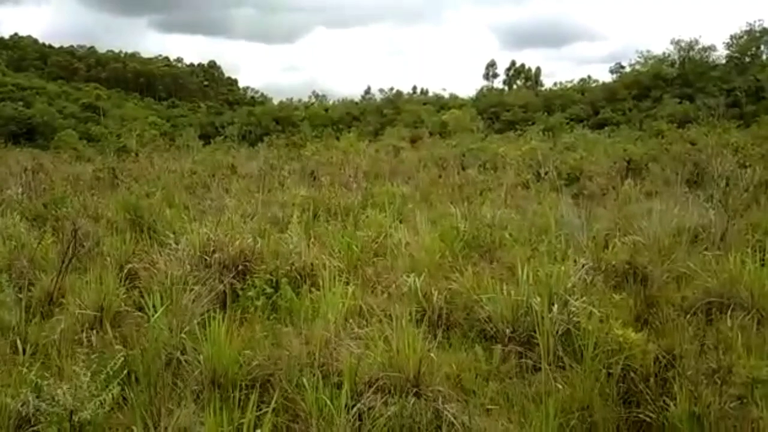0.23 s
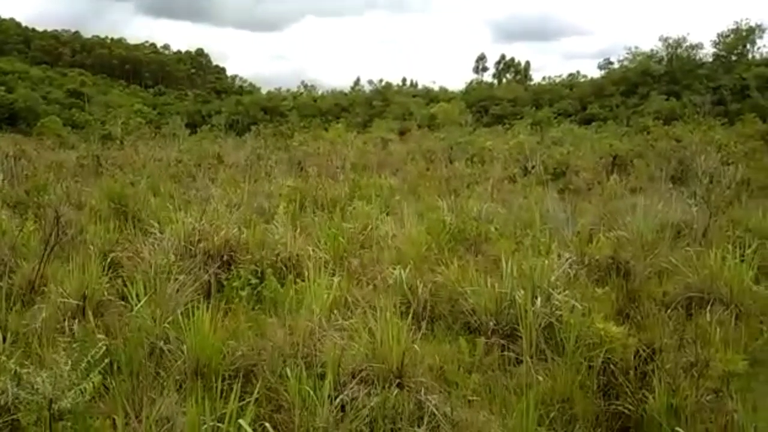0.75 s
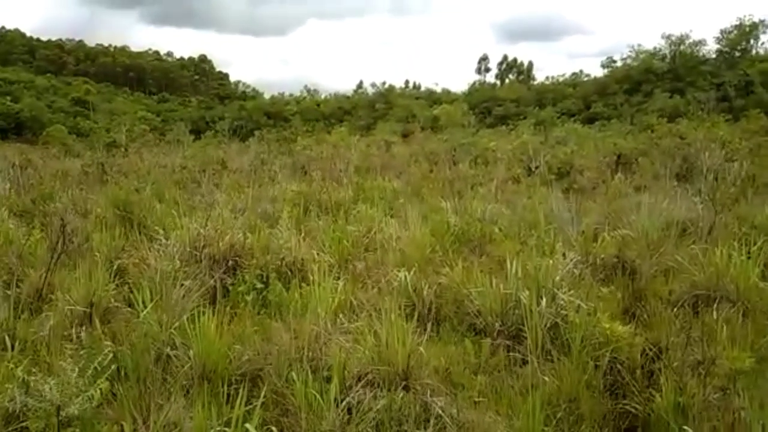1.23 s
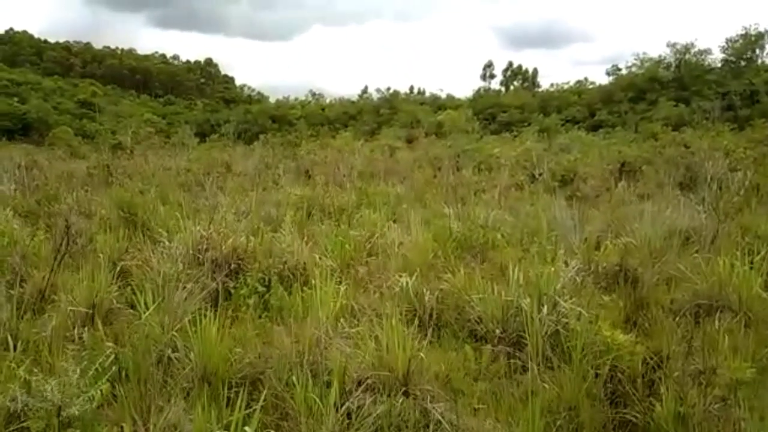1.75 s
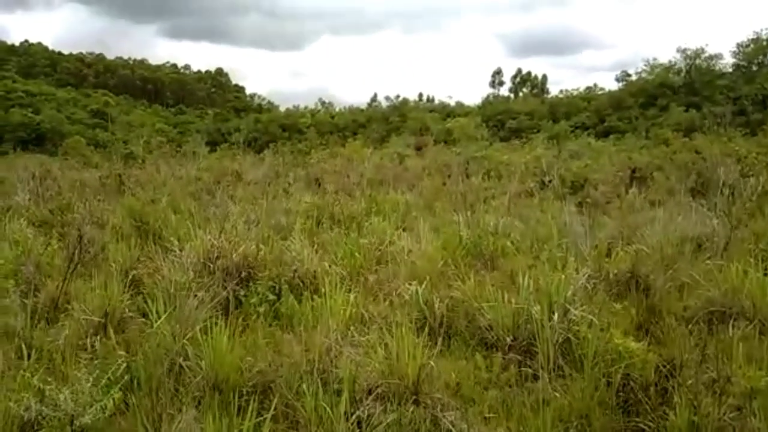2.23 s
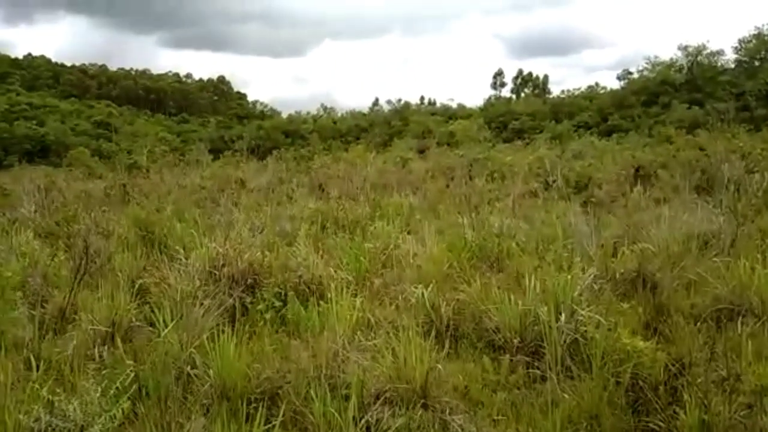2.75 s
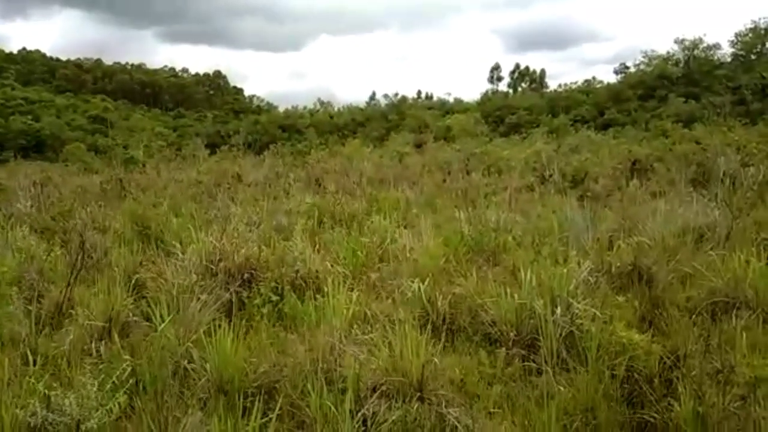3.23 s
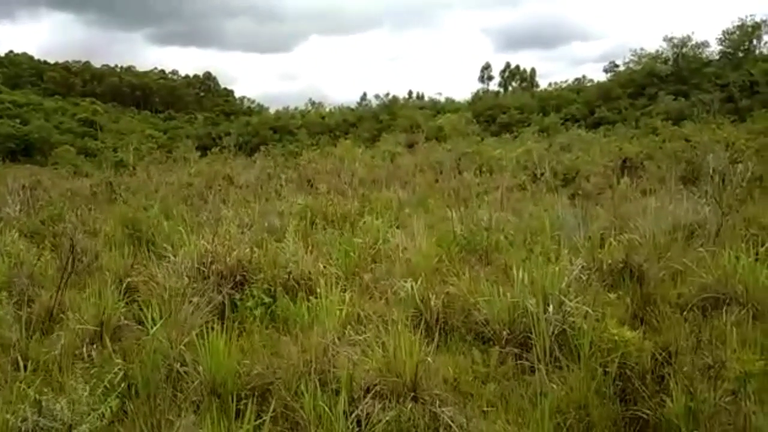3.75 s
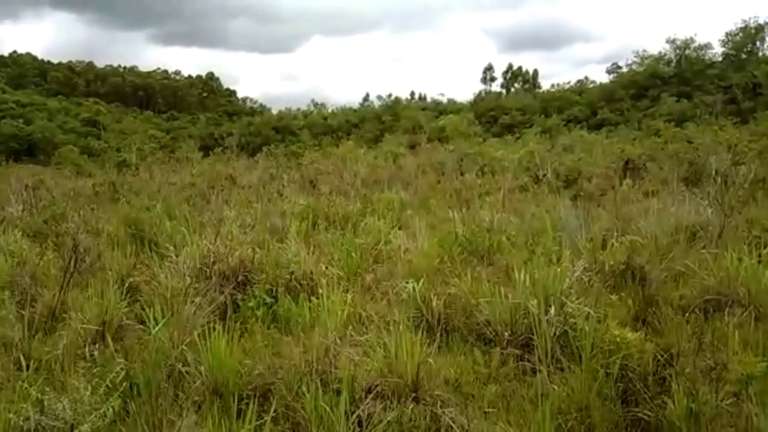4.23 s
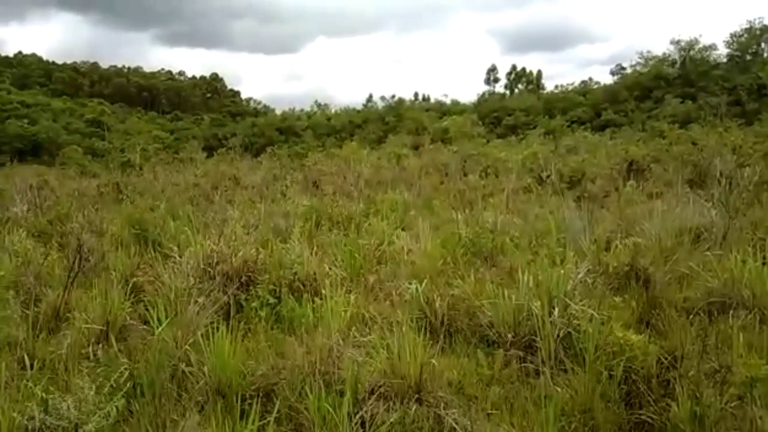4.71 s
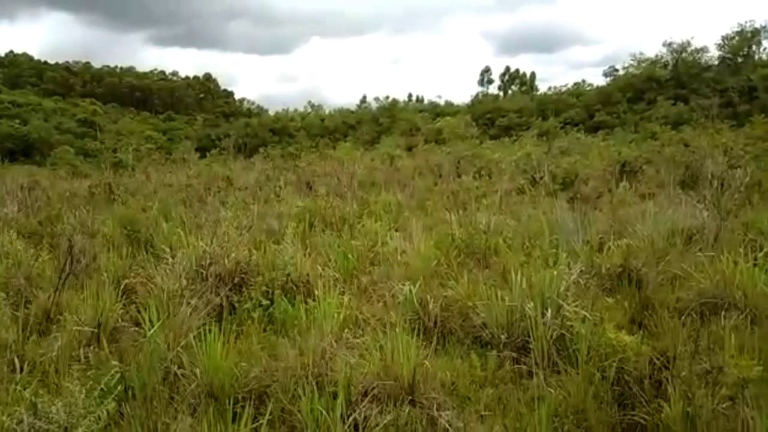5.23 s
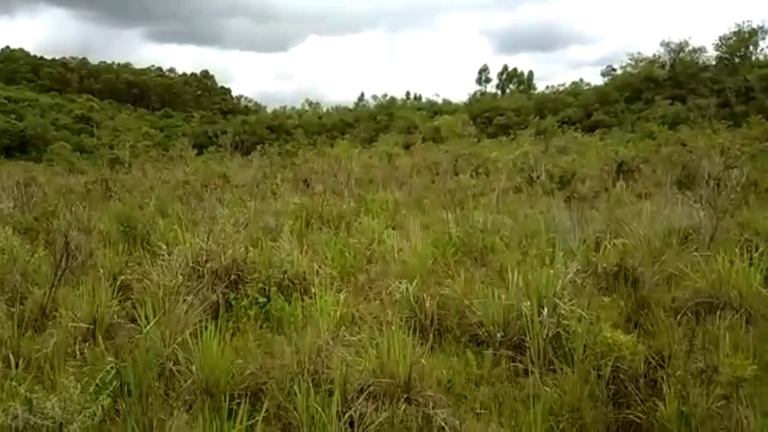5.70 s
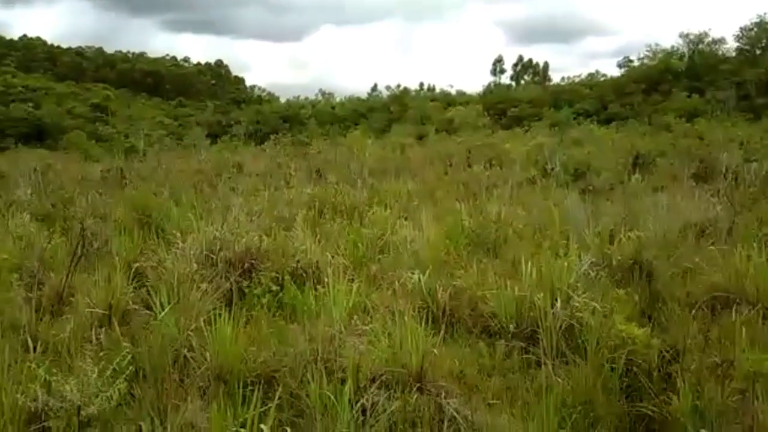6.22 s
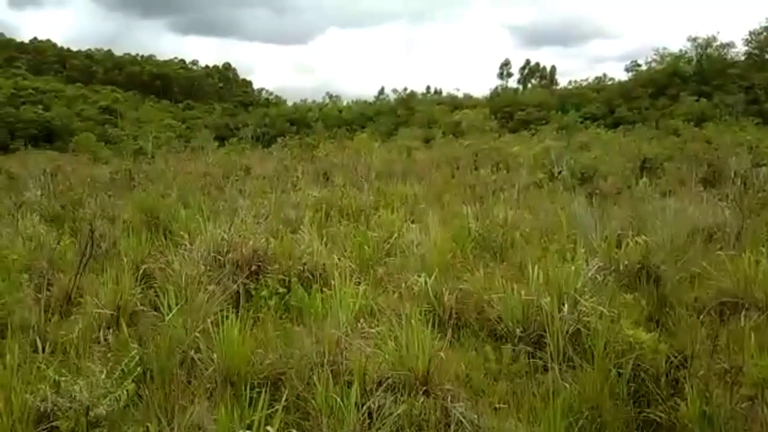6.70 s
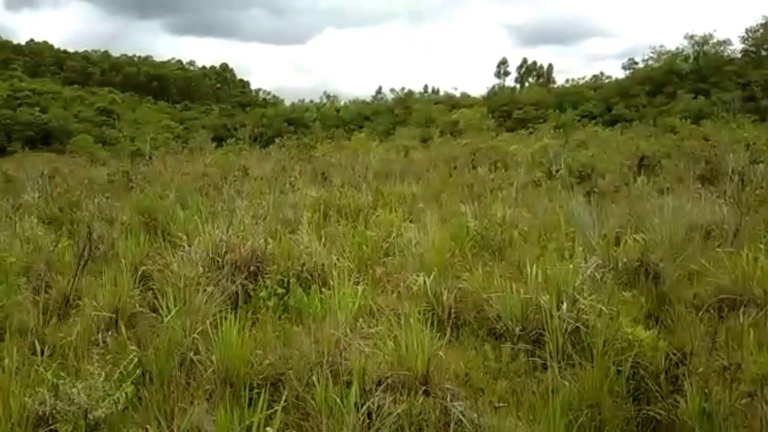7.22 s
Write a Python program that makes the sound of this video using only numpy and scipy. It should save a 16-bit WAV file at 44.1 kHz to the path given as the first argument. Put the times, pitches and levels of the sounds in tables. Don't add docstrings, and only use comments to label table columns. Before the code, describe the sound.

Distant pack of dogs howling and yipping over quiet grassland, brief bird whistles, later a chirping insect, under a faint airy hush.

```python
import sys
import numpy as np
from scipy import signal
from scipy.fft import rfft, irfft
from scipy.io import wavfile

SR = 44100
rng = np.random.default_rng(int(sys.argv[2]) if len(sys.argv) > 2 else 0)


def makeup_ratio(level_db):
    decades = np.asarray(level_db, float) / 20
    return 10 ** decades


def dump_mix(stems):
    frames = np.atleast_2d(stems).T
    limited = np.clip(frames, -1, 1)
    pcm = np.round(limited * 32767).astype(np.int16)
    wavfile.write(sys.argv[1], SR, pcm)


N = 328986


def rms_one(x):
    return x / np.sqrt(np.mean(x ** 2) + 1e-20)


def in_time(rows):
    s, *columns = np.transpose(rows)
    at = np.arange(round(s[0] * SR), min(round(s[-1] * SR), N))
    return at, [np.interp(at / SR, s, c) for c in columns]


def at_hz(points, hz):
    return np.interp(np.log(hz), np.log(np.array(points)[:, 0]), np.array(points)[:, 1])


def fade(count, seconds):
    return np.clip(np.minimum(np.arange(count), np.arange(count)[::-1]) / (seconds * SR), 0, 1)


def drift(rate):
    r = np.exp(-2 * np.pi * rate / SR)
    once = signal.lfilter([1], [1, -r], rng.standard_normal(N + SR))
    return rms_one(signal.lfilter([1], [1, -r], once)[SR:])


def resonate(x, modes):
    out = 0
    for k, (hz, width, level_db) in enumerate(modes):
        r = np.exp(-np.pi * width / SR)
        b = (1 - r * r) / 2 * np.array([1, 0, -1])
        a = [1, -2 * r * np.cos(2 * np.pi * hz / SR), r * r]
        twice = signal.lfilter(b, a, signal.lfilter(b, a, x + 1e-18))
        out = out + (-1) ** k * makeup_ratio(level_db) * twice
    return out


def left_right(tilt_db):
    return makeup_ratio(np.array([[tilt_db], [-tilt_db]]))


def place(x, pan_db, lag):
    left = np.interp(np.arange(len(x)) - lag, np.arange(len(x)), x)
    return np.array([left, x]) * left_right(pan_db / 2)


# (from time [s], howl cycles per slap, irregularity [0-1])
SLAPS = [(0, 3, 0), (.3, 5, 0), (1.4, 5, .5), (1.72, 2, .03), (2.22, 5, .16), (3.5, 5, 0), (4.17, 5, .3),
         (4.45, 5, .15), (4.89, 5, 0), (6.4, 5, .12), (6.61, 5, .02), (6.715, 3, 0), (6.815, 5, .2),
         (7.2, 5, .04)]


def slapping(s):
    starts, cycles, chaos = np.transpose(SLAPS)
    k = np.searchsorted(starts, s, side="right") - 1
    return cycles[k], chaos[k]


# (frequency [Hz], gain [dB per dB of opening])
OPENING = [(560, -1), (750, 0), (1130, 0), (1350, -0.64), (1900, -0.23)]
# (frequency [Hz], gain [dB per dB of strain])
STRAIN = [(1150, 0), (1300, 1)]


def howls(calls, places, voice, wobble, flutter, shimmer_db, count=5):
    erratic = slapping(np.arange(N) / SR)[1]
    unsteady = wobble * drift(16.7) + flutter * erratic * drift(101.3)
    out, shimmer = np.zeros((2, N)), drift(12.7)
    for call, (pan_db, lag) in zip(calls, places):
        at, (hz, level_db, opening_db, *strain_db) = in_time(call)
        phase = 2 * np.pi * np.cumsum(hz * (1 + unsteady[at])) / SR
        tone = 0
        for k in range(1, count + 1):
            colour_db = at_hz(voice, k * hz) + opening_db * at_hz(OPENING, k * hz)
            colour_db = colour_db + sum(strain_db) * at_hz(STRAIN, k * hz)
            tone = tone + makeup_ratio(colour_db) * np.sin(k * phase + k - 1)
        loudness = np.sqrt(2) * makeup_ratio(level_db + shimmer_db * shimmer[at])
        out[:, at] += place(tone * loudness * fade(len(at), 0.0034), pan_db, lag)
    return out


# (time [s], pitch [Hz], level [dB], mouth opening [dB])
FIRST_HOWL = [
    (0.0, 447.7, -39, -0.5),
    (0.318, 448.3, -37.5, 2.5),
    (1.178, 458.3, -43.5, -3),
    (1.215, 459.5, -48.5, -11.5),
    (1.26, 464, -60, -33),
]
SECOND_HOWL = [
    (1.24, 358.7, -56, 3),
    (1.271, 372, -34, -1),
    (1.295, 420, -36, -2),
    (1.42, 461.4, -32.5, -1),
    (1.58, 463.7, -32, 4.5),
    (1.701, 464, -35, 0),
]
LONG_HOWL = [
    (1.695, 446, -33.5, 2),
    (1.95, 443, -32.5, -2),
    (2.3, 446, -35.5, -1.5),
    (2.5, 445, -36.5, -5),
    (3.3, 445, -41.5, 3),
    (3.45, 442, -35.5, 0),
    (3.6, 440.4, -43, -1),
    (3.69, 435, -45, 5),
]
BELL_HOWL = [
    (4.21, 319, -50, 0),
    (4.255, 374, -36, 4),
    (4.28, 420, -37, -9.5),
    (4.35, 442, -36, 4),
    (4.6, 467.1, -32.5, 0),
    (4.85, 431.8, -37.5, 4),
    (5.48, 448.8, -36, 3),
    (6.3, 442.7, -37, 2),
    (6.36, 433.6, -49, -14),
]
# (left minus right [dB], left lag [samples])
CLEAR_AT = [(5.5, .1), (3.5, .2), (2.5, .2), (1, 3.4)]
# (frequency [Hz], level [dB])
CLEAR_VOICE = [(320, -23.5), (450, -10), (750, 2), (900, 0), (1130, 4), (1340, -23), (1800, -31.5),
               (2300, -62)]


def clear_howls():
    calls = [FIRST_HOWL, SECOND_HOWL, LONG_HOWL, BELL_HOWL]
    return howls(calls, CLEAR_AT, CLEAR_VOICE, wobble=0.0026, flutter=0.039, shimmer_db=1.13)


HOARSE = [
    [(1.8, 463.9, -44, 8), (2.17, 468.3, -37, 8), (2.22, 475.4, -29.5, 1), (2.288, 482.2, -28, 7),
     (2.694, 482.3, -27.5, -1), (2.826, 484.9, -30, 3), (3.318, 494, -25.5, 2.5), (3.44, 460.6, -35, -0.5),
     (3.58, 459.5, -40, -9.5)],
    [(6.33, 438, -45.5, -4, 2), (6.43, 465.8, -43.5, 21, 12), (6.7, 458.3, -52, 2, 17),
     (6.766, 449, -55.5, -12, 10), (6.92, 476.8, -44.5, -1, 8.5), (7.17, 455, -43.5, 2, 11)],
    [(7.175, 457, -43, -4, 9), (7.22, 457.6, -43, -6.5, 3.5), (7.336, 468.4, -46.5, -18, 2),
     (7.4, 468.6, -50, -10.5, 9), (7.46, 462, -46, 3, 14)],
]
# (left minus right [dB], left lag [samples])
HOARSE_AT = [(6.4, .1), (6.1, 1.8), (6.8, .1)]
# (frequency [Hz], level [dB])
HOARSE_VOICE = [(460, -10.5), (970, -0.5), (1450, -19.5), (1930, -27.5), (2400, -94)]


def hoarse_howls():
    return howls(HOARSE, HOARSE_AT, HOARSE_VOICE, wobble=0.0038, flutter=0.0966, shimmer_db=2.0)


# (time [s], first slap [dB], second slap [dB])
BREAKS = [
    (1.2326, -50, -41),
    (3.5851, -43, -61),
    (3.7135, -57, -67),
    (6.324, -42.5, -52),
]
# (time [s], level [dB])
STRAYS = [(3.506, -51), (7.022, -52), (7.048, -50), (7.0744, -49), (7.1174, -50), (7.165, -43),
          (1.265, -42)]


def lone_slaps():
    break_gap_s, break_throat_db, lone_throat_db = 0.0165, -11.5, -15
    dying_s, dying_gap_s, dying_db, dying_loss_db = 4.928, 0.0755, -43, 2.3
    pairs = []
    for s, *both in BREAKS:
        pairs += [(s + k * break_gap_s, db, break_throat_db) for k, db in enumerate(both)]
    dying = [(dying_s + k * dying_gap_s, dying_db - k * dying_loss_db) for k in range(7)]
    early = [(s - 0.016, db - 4) for s, db in dying[:3]]
    return pairs + [(s, db, lone_throat_db) for s, db in dying + early + STRAYS]


# (start [s], full from [s], full until [s], end [s], level at the mouth resonance [dB])
RASP = [
    (0.0, -0.004, 0.017, 0.18, -41.5),
    (1.398, 1.426, 1.62, 1.75, -46.5),
    (1.83, 2.28, 3.37, 3.5, -32),
    (4.158, 4.173, 4.776, 4.92, -38.5),
    (6.405, 6.43, 6.85, 7.09, -39),
    (7.23, 7.255, 7.42, 7.37, -38.5),
]
RASP_THROAT = [-0.5, 8, -1, -2, -3.5, -2.5]
# (frequency [Hz], width [Hz], level [dB])
MOUTH = [(986, 92, 8.5), (1123, 101, 8.5), (1408, 300, -10.5), (1775, 106, -10), (1947, 89, -9)]
THROAT_HEAD_RAISED = [(672, 167, 7.5), (254, 90, -15)]
THROAT_HEAD_DOWN = [(580, 150, 5), (247, 82, -10)]


def rasp():
    start_db, end_db, head_down_s = -28, -16.5, 4.9
    mouth, throat, soft = np.zeros(N), np.zeros(N), np.zeros(N)
    calls = [FIRST_HOWL, SECOND_HOWL, HOARSE[0], BELL_HOWL, HOARSE[1], HOARSE[2]]
    for (*times, full_db), throat_db, call in zip(RASP, RASP_THROAT, calls):
        pitch = np.array(call)
        s = max(times[0], 0)
        for gap, size, balance in rng.standard_normal((400, 3)):
            if s >= min(times[-1], (N - 1) / SR):
                break
            cycles, chaos = slapping(s)
            period = cycles / np.interp(s, pitch[:, 0], pitch[:, 1])
            level_db = full_db + np.interp(s, times, [start_db, 0, 0, end_db]) + 4 * chaos * size
            i = int(s * SR)
            mouth[i] += makeup_ratio(level_db + 36.5) * np.sqrt(period * 100)
            throat[i] += mouth[i] * makeup_ratio(throat_db + 7.7 * chaos * balance)
            s += period * np.clip(1 + 0.68 * chaos * gap, 0.3, 2)
    for s, peak_db, throat_db in lone_slaps():
        soft[int(s * SR)] += makeup_ratio(peak_db + 42)
        throat[int(s * SR)] += makeup_ratio(peak_db + throat_db + 53.0)
    dull = signal.butter(3, 1500, fs=SR, output="sos")
    mouth += signal.sosfilt(dull, soft + 1e-18)
    raised = np.arange(N) < head_down_s * SR
    low = resonate(throat * raised, THROAT_HEAD_RAISED) + resonate(throat * ~raised, THROAT_HEAD_DOWN)
    distance = signal.butter(6, 2100, fs=SR, output="sos")
    return signal.sosfilt(distance, resonate(mouth, MOUTH) - low)


# (time [s], pitch [Hz], level [dB], mouth opening [dB], strain [dB])
CRIES = [
    [(1.325, 515, -39.5, -1, 2.5), (1.35, 535, -37, -1.5, 4), (1.385, 485.4, -37.5, -8.5, 4),
     (1.425, 452, -47.5, -11, 2), (1.48, 500, -49.5, 4, 8), (1.53, 485, -56, 1, 6)],
    [(1.91, 495, -49, -9, -5), (1.941, 512, -45, -10.5, -0.5), (2.025, 466.8, -36, -6.5, 7.5),
     (2.068, 465, -36, 4, -4.5), (2.12, 501, -37, -4, 2), (2.22, 475, -40, 3, -3)],
    [(3.988, 492, -56, -12, 8.5), (4.035, 451.6, -58.5, -24.5, 10), (4.06, 425, -53, -16, -8),
     (4.14, 455, -40, 2, -5), (4.172, 490, -37.5, 18, -3), (4.25, 519.4, -39.5, 15, -9)],
    [(5.975, 468, -62, -13, 7), (6.0, 462, -55.5, -15, 11.5), (6.045, 422, -57, -16, -1),
     (6.15, 440, -50.5, -5.5, -3), (6.33, 445, -52.5, -5, 4)],
]
# (left minus right [dB], left lag [samples])
CRIES_AT = [(6.7, .11), (6.1, .1), (5.7, .12), (3.0, 2.1)]
# (frequency [Hz], level [dB])
CRY_VOICE = [(450, 0), (950, 0.5), (1400, -9), (1900, -11.5), (2400, -30)]


def cries():
    return howls(CRIES, CRIES_AT, CRY_VOICE, wobble=0.006, flutter=0.043, shimmer_db=3.0)


def glides(rows):
    peak_share, start_db, end_db = 0.49, -11, -13
    calls = []
    for s, length, from_hz, to_hz, db in rows:
        done = 0.734 if to_hz > from_hz else 0.404
        peak_hz = from_hz + done * (to_hz - from_hz)
        calls.append([(s, from_hz, db + start_db, 0),
                      (s + peak_share * length, peak_hz, db, 0),
                      (s + length, to_hz, db + end_db, 0)])
    return calls


# (time [s], length [s], from pitch [Hz], to pitch [Hz], peak level [dB])
YELPS = [
    (1.742, .055, 320, 388, -40),
    (3.575, .04, 440, 410, -43),
    (3.175, 0.042, 430, 405, -33),
]
# (left minus right [dB], left lag [samples])
YELPS_AT = [(5.1, .11), (2.9, 5), (3.5, 8)]
# (frequency [Hz], level [dB])
YELP_VOICE = [(400, -8), (750, 7.5), (1050, 4), (1250, 2.5), (1450, -4), (1700, -10.5), (1950, -1),
              (2200, -40)]


def yelps():
    return howls(glides(YELPS), YELPS_AT, YELP_VOICE, wobble=0.0054, flutter=0.027, shimmer_db=4.5)


# (time [s], length [s], from pitch [Hz], to pitch [Hz], peak level [dB])
SHRIEKS = [
    (3.69, .045, 874, 543, -43),
    (7.17, 0.039, 804, 761, -37.5),
]
# (time [s], pitch [Hz], level [dB], mouth opening [dB])
SCREAM = [
    (3.105, 1076, -37, 8),
    (3.125, 1038, -26.5, 10),
    (3.145, 961, -33, -9),
    (3.163, 790, -33.5, -5),
    (3.175, 850, -34, 5),
    (3.2, 834.5, -37, 12),
]
# (left minus right [dB], left lag [samples])
SHRIEKS_AT = [(1.5, 8.1), (7, .1), (3.4, 8.8)]
# (frequency [Hz], level [dB])
SHRIEK_VOICE = [(600, -6), (850, -0.5), (1050, 3), (1500, -1.5), (1950, -1.5), (2150, -18), (2500, -45)]


def shrieks():
    calls = glides(SHRIEKS) + [SCREAM]
    return howls(calls, SHRIEKS_AT, SHRIEK_VOICE, wobble=0.0032, flutter=0.02, shimmer_db=0.0, count=2)


# (time [s], length [s], from pitch [Hz], to pitch [Hz], peak level [dB])
YIPS = [
    (1.228, 0.025, 1433, 1340, -46),
    (1.465, 0.072, 1247, 1264, -41),
    (1.54, 0.048, 730, 690, -34),
    (1.54, 0.077, 430, 174, -50),
    (4.88, 0.63, 651, 658, -61),
    (5.48, 0.059, 430.7, 367.5, -51.5),
    (7.15, .03, 567, 573, -31.5),
]
# (left minus right [dB], left lag [samples])
YIPS_AT = (2.6, .3)
# (frequency [Hz], level [dB])
YIP_VOICE = [(200, 0), (1500, 0)]


def yips():
    places = [YIPS_AT] * len(YIPS)
    return howls(glides(YIPS), places, YIP_VOICE, wobble=0.0079, flutter=0.01, shimmer_db=1, count=1)


# (delay [s], level [dB], left minus right [dB])
ECHOES = [
    (0.044, -18.5, -9.5),
    (.097, -14.5, -1.5),
    (.16, -35, 28),
    (.34, -29.5, 18),
]


def tree_line(x):
    answer = np.zeros((2, SR // 2))
    dull = signal.sosfilt(signal.butter(2, 1500, fs=SR, output="sos"), x)
    for delay, level_db, pan_db in ECHOES:
        leaves = rng.standard_normal((2, 2600)) * np.hanning(2600) / 31
        answer[:, int(delay * SR):][:, :2600] += leaves * makeup_ratio(level_db) * left_right(pan_db / 2)
    return signal.fftconvolve(dull[None], answer, axes=1)[:, :N]


CHIRPS = [3.5409, 3.7638, 3.9978, 4.2133, 4.4378, 4.6962, 4.9294, 5.1417, 5.3817, 5.6286, 5.8566, 6.0955,
          6.3345, 6.563, 6.8064, 7.0703, 7.3332]
# (frequency [Hz], width [Hz], level [dB])
WING = [(4790, 316, 8), (9770, 600, -0.5), (14160, 700, -6.5)]


def chirping_insect():
    level_db, warm_up_db, warm_up_s = -60, -5.5, 1.3
    t, gate = np.arange(N) / SR, np.zeros(N)
    for s in CHIRPS:
        chirp_db = level_db + warm_up_db * np.exp((CHIRPS[0] - s) / warm_up_s)
        gate += makeup_ratio(chirp_db) * np.clip(np.minimum((t - s) / 0.017, (s + 0.187 - t) / 0.02), 0, 1)
    stroke_hz = 113 * (1 + 0.0301 * drift(3.3))
    strokes = np.maximum(np.sin(2 * np.pi * np.cumsum(stroke_hz) / SR), 0) ** 0.5
    chirp = makeup_ratio(18) * resonate(gate * strokes * rng.standard_normal((2, N)), WING)
    return chirp * left_right(2.5)


# (frequency [Hz], width [Hz], level [dB])
BUZZ = [(4855, 220, -72), (8240, 280, -73.5), (6040, 110, -75.5)]


def buzzing_insects():
    return makeup_ratio(25) * resonate(makeup_ratio(0.83 * drift(60)) * rng.standard_normal((2, N)), BUZZ)


# (time [s], length [s], from pitch [Hz], to pitch [Hz], level [dB])
WHISTLES = [
    (1.87, .14, 4650, 5600, -52),
    (4.741, 0.17, 5120, 5560, -58),
]


def bird():
    out = np.zeros(N)
    for s, length, from_hz, to_hz, level_db in WHISTLES:
        t = np.arange(int(length * SR)) / SR
        warble_hz = 120 * np.sin(2 * np.pi * 180 * t)
        hz = from_hz + (to_hz - from_hz) * np.sqrt(t / length) + warble_hz
        whistle = np.sin(np.pi * t / length) * np.sin(2 * np.pi * np.cumsum(hz) / SR)
        out[int(s * SR):][:len(t)] += makeup_ratio(level_db) * whistle
    return out


# (frequency [Hz], side against mid [dB])
APART = [(40, -5), (200, -11.5), (900, 2), (2500, -0.5), (5000, 2.5), (14000, 0.5)]


def coloured(spectrum):
    hz = np.maximum(np.arange(N // 2 + 1) * SR / N, 1)
    shape, apart = makeup_ratio(at_hz(spectrum, hz)), makeup_ratio(at_hz(APART, hz))
    noise = rfft(rng.standard_normal((2, N)))
    mid, side = irfft(noise * shape * [np.ones_like(apart), apart], N)
    return (mid + side * [[1], [-1]]) / np.std(mid)


# (time [s], half length [s], level [dB])
RUSTLE = [
    (5.213, 0.08, -56.5),
]


def grass():
    t = np.arange(N) / SR
    swell = sum(makeup_ratio(level_db) * np.exp(-((t - s) / half) ** 4) for s, half, level_db in RUSTLE)
    return swell * makeup_ratio(3.7 * drift(80)) * coloured([(1000, -9.5), (3000, -23), (6000, -15), (15000, -28)])


# (time [s], level [dB])
HUSH = [
    (0.0, -67.5),
    (1.18, -70),
    (2.22, -65),
    (3.3, -64),
    (3.86, -72),
    (4.26, -68),
    (7.46, -67.5),
]
# (frequency [Hz], level [dB per Hz])
FIELD = [(76, -34), (130, -4), (156, -13), (210, -12.5), (712, -6), (787, -5.5), (1270, -10), (3530, -21),
         (4860, -15), (7540, -24), (9590, -25), (15500, -30.5)]


def field_hush():
    hush_db = np.interp(np.arange(N) / SR, *np.transpose(HUSH))
    return makeup_ratio(hush_db + 11.5 + 1.59 * drift(10.4)) * coloured(FIELD) * left_right(1.2)


# (time [s], level [dB])
WIND = [(0.0, -70), (0.27, -63), (0.81, -70), (1.16, -54.5), (1.33, -68.5), (2.64, -60.5), (5.44, -65),
        (6.94, -60), (7.0, -68), (7.21, -62), (7.46, -67)]
# (frequency [Hz], level [dB per Hz])
GUST = [(12, -46), (20, -23), (43, -8), (59, 3), (125, -13), (151, -19), (200, -10), (260, -65),
        (440, -120)]


def wind():
    wind_db = np.interp(np.arange(N) / SR, *np.transpose(WIND))
    return makeup_ratio(wind_db + 0.76 * drift(17)) * coloured(GUST) * left_right(-1.1)


def scene():
    dogs = clear_howls() + hoarse_howls() + place(rasp(), pan_db=4.5, lag=1.0)
    dogs += cries() + yelps() + shrieks() + yips()
    echoes = tree_line(dogs.mean(axis=0))
    animals = chirping_insect() + buzzing_insects() + place(bird(), 1.4, 0)
    return dogs + echoes + animals + grass() + field_hush() + wind()


def roll_off(x):
    return signal.sosfilt(signal.butter(12, 15400, fs=SR, output="sos"), x)


def record(dry):
    slip_hz = 3890.5
    slip = (np.arange(N) * slip_hz / SR) % 1 - 0.5
    changed = dry + slip * np.gradient(dry, axis=1)
    return roll_off(changed)


dry = scene()
out = record(dry)
dump_mix(out)
```